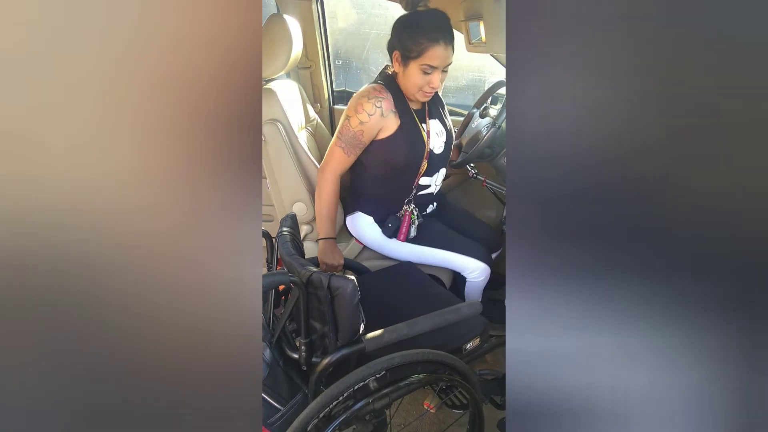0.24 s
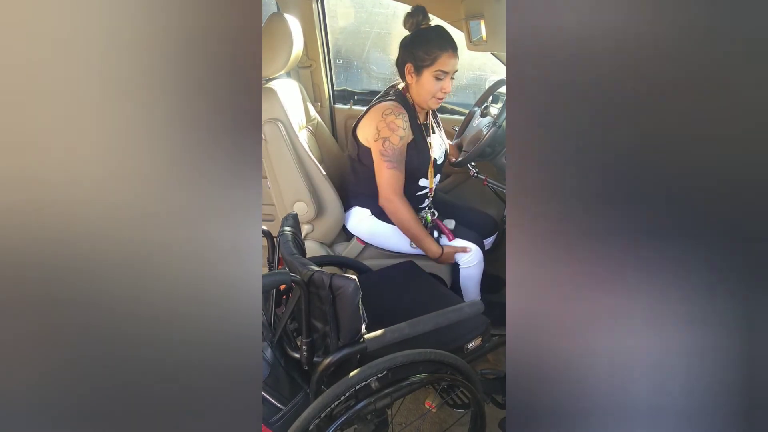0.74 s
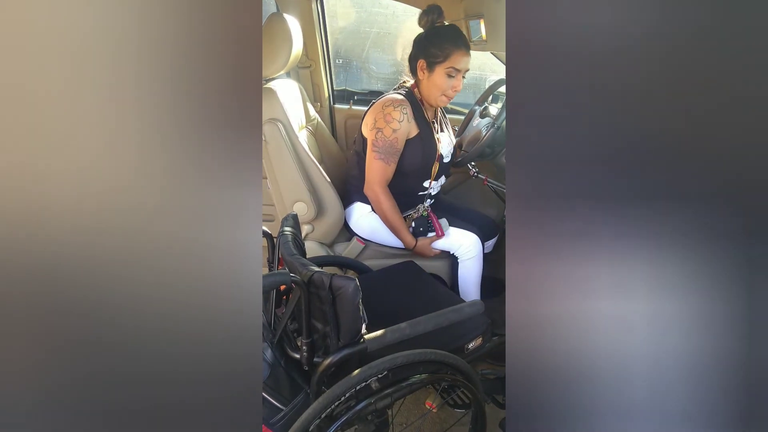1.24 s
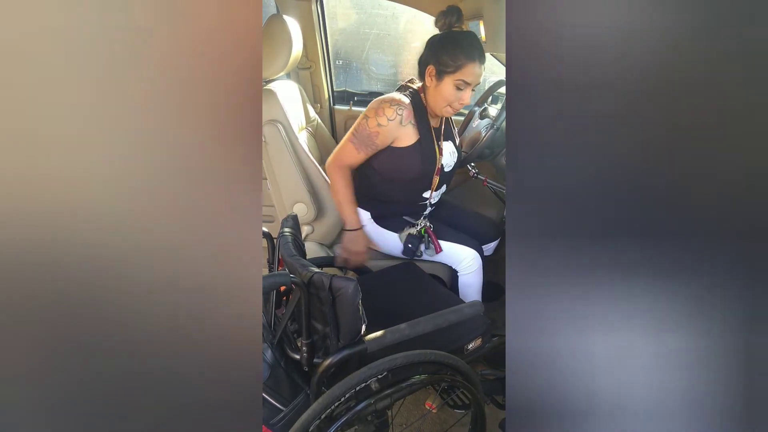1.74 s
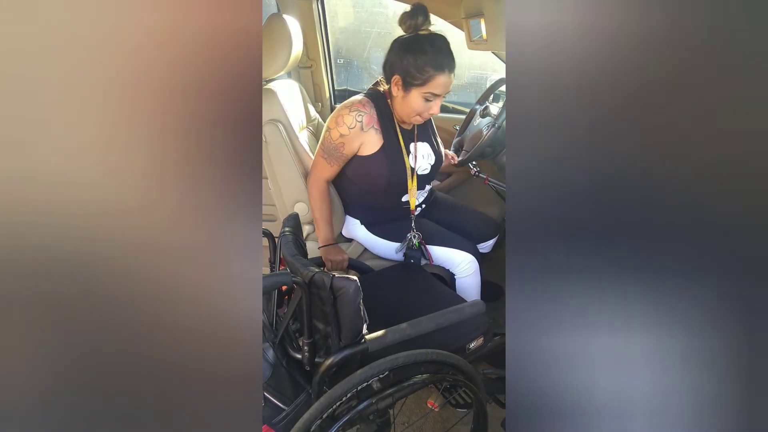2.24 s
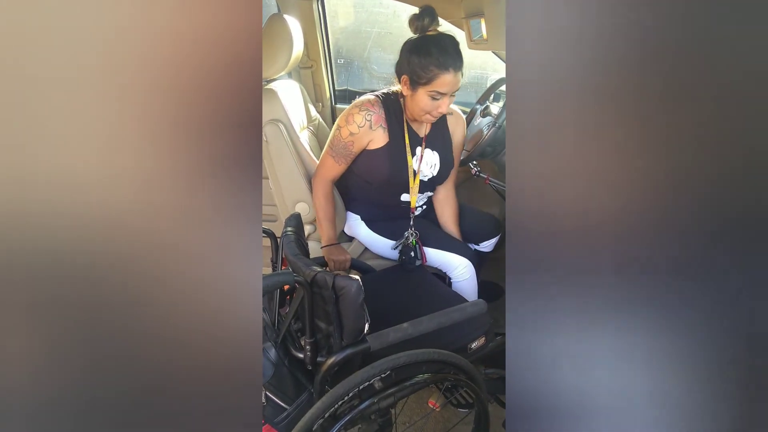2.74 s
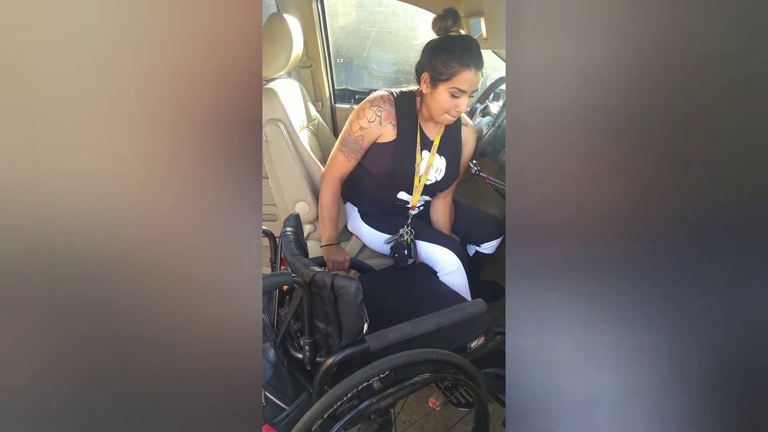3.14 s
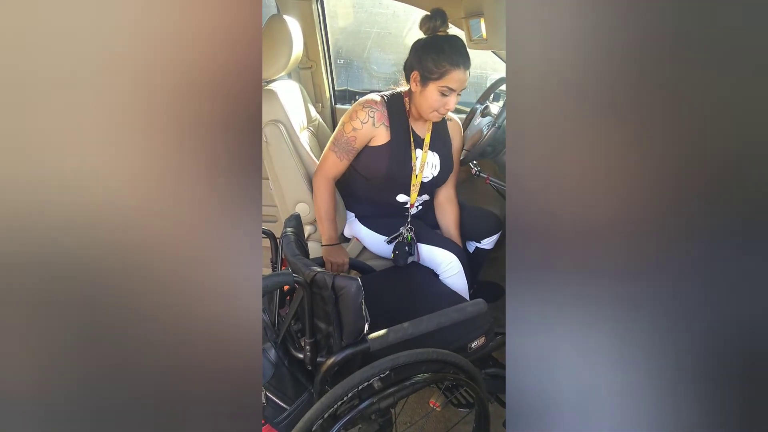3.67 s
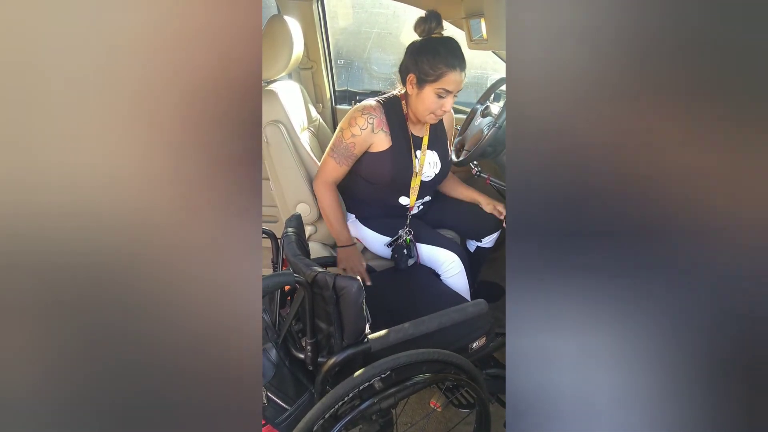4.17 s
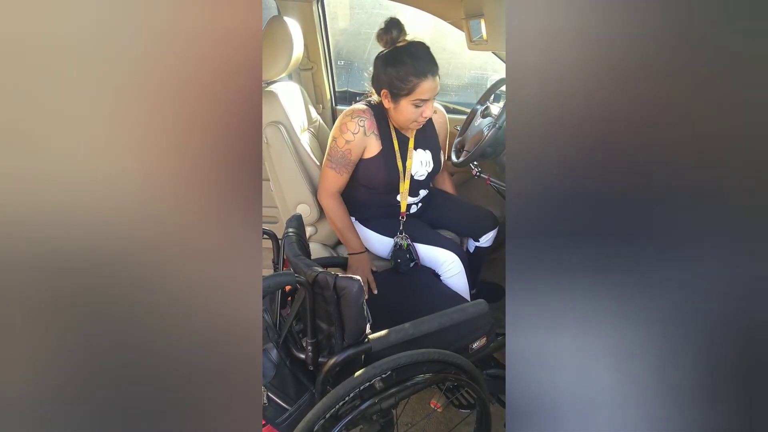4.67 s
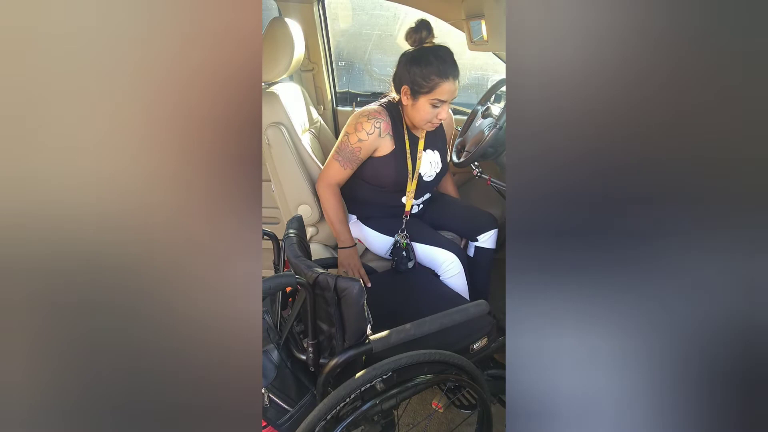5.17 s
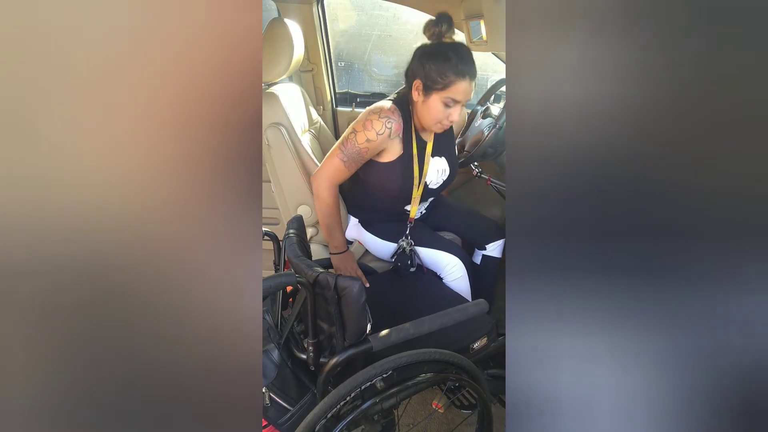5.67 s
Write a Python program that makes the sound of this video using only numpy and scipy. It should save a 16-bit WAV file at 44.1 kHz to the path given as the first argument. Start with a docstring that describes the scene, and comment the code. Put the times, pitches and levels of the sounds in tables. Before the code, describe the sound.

A bunch of keys jangles and clinks in irregular bursts while clothes rustle, a seat knocks and squeaks, and a car cabin rumbles low.

```python
"""Keys clink and rattle in swells over rustling cloth, dull knocks, thin squeaks and a low cabin rumble.
A bunch of keys swings on a lanyard while someone shifts across a car seat towards a wheelchair.
Keys ring until they stop each other, plastic fobs clack, and many tiny contacts make the rattle.
Clothes rub, seat and chair frame knock and squeak: filtered noise and fading tones make these sounds.
A machine hum of four unsteady tones, shaped noise for rumble and a faint hiss fill the cabin."""
import sys
import numpy as np
from scipy import signal
from scipy.fft import rfft, irfft, next_fast_len
from scipy.io import wavfile
from scipy.ndimage import uniform_filter1d, map_coordinates

SR = 44100
rng = np.random.default_rng(int(sys.argv[2]) if len(sys.argv) > 2 else 0)


def output_pcm(signal):
    """Save a mono or channel-first signal as 16-bit PCM at the path in sys.argv[1].

    Samples are clipped to [-1, 1] before scaling.
    """
    pcm = np.clip(np.atleast_2d(signal).T, -1, 1) * 32767
    wavfile.write(sys.argv[1], SR, np.round(pcm).astype(np.int16))


N = 260631
T = np.arange(SR // 3) / SR  # time within one hit, in s

# colour of small hard contacts: (f/Hz, level/dB)
CONTACT = [(800, -39), (2200, -13), (3000, -2.5), (4300, -4), (5200, -0.5), (7000, -1), (9000, -3),
           (12000, -7.5), (14300, -14), (16000, -26.5)]
# higher ringing modes of each kind of key: (f/Hz, relative level/dB, t60/s)
KEYS = {"long": [(6320, 0, .14), (6803, -8, .15), (7644, 3, .09), (8790, 1, .1), (11560, -7, .12),
        (14120, -12, .1)], "short": [(4386, 3, .07), (5905, -12, .1), (6810, -7, .12), (7670, -4, .07),
        (8840, 0, .1), (12800, -13, .06), (13780, -11, .07)], "flat": [(6803, 0, .16), (7740, 0, .06),
        (8760, -5, .06), (10510, -4, .11), (11560, -2, .12), (12840, -11, .08), (14150, -9, .07)],
        "thin": [(7670, 1, .07), (8700, -5, .05), (9800, -3, .07), (13110, -6, .1), (14500, -9, .07)]}
# range in which the small parts ring: (lowest f/Hz, highest f/Hz)
SMALL_HZ = (2600, 15000)


def amp(db):
    """Decibels to gain."""
    return 10 ** (np.asarray(db) / 20)


def unit(x):
    """Scale to rms 1."""
    return x / np.sqrt(np.mean(x ** 2) + 1e-20)


def along(points, hz):
    """Read a curve of (f/Hz, value) points on a log frequency axis."""
    f, v = np.transpose(points)
    return np.interp(np.log(hz + 1), np.log(f + 1), v)


def curves(rows):
    """One value per sample for each column after the time."""
    s, *cols = np.transpose(rows)
    return [np.interp(np.arange(N) / SR, s, c) for c in cols]


def wobble(rate):
    """A smooth random curve through rate random knots a second."""
    knots = rng.standard_normal(int(N * rate / SR) + 4)
    return map_coordinates(knots, [np.arange(N) * rate / SR])


def filtered(x, response):
    """Multiply the spectrum of x by a response of frequency."""
    m = next_fast_len(x.shape[-1] + SR // 5)
    spectrum = rfft(x, m) * response(np.fft.rfftfreq(m, 1 / SR))
    return irfft(spectrum, m)[..., :x.shape[-1]]


def coloured(pair, spectrum, ripple_db=0):
    """Blend two unrelated signals into a left and right of rms 1, more or less alike by frequency."""
    # how alike left and right are: (f/Hz, likeness from -1 opposite to 1 same)
    alike = [(40, -0.46), (70, 0.33), (130, 0.3), (300, 0.58), (700, 0.67), (1400, 1), (2200, -0.71),
             (3100, 0.48), (4300, -0.13), (15000, -0.39)]
    knots = rng.standard_normal(SR // 400)  # random resonances a few hundred Hz wide

    def response(hz):
        turn = np.arccos(np.clip(along(alike, hz), -1, 1)) / 2
        ripple = ripple_db * np.interp(hz, np.linspace(0, SR / 2, len(knots)), knots)
        return amp(along(spectrum, hz) + ripple) * np.array([np.cos(turn), np.sin(turn)])

    mid, side = filtered(pair, response)
    return unit(np.array([mid + side, mid - side]))


def noise(spectrum, size, ripple_db=0):
    """Stereo noise of a given colour."""
    return coloured(rng.standard_normal((2, size)), spectrum, ripple_db)


def fade(t60, rise):
    """A hit's envelope: a quick rise and a fall of 60 dB in t60 seconds."""
    return np.exp(-np.log(1000) * T / max(t60, 1e-3)) * (1 - np.exp(-T / max(rise, 1e-5)))


def tone(hz, spread, blur=0):
    """A stereo sine; spread is the random phase shift per side in rad, blur the line width over pitch."""
    drift = 0
    if blur:
        drift = np.sqrt(2 * np.pi * abs(blur) * hz / SR) * np.cumsum(rng.standard_normal(len(T)))
    phase = rng.uniform(0, 2 * np.pi) + spread * rng.standard_normal((2, 1))
    return np.sin(2 * np.pi * hz * T + phase + drift)


def shake(rate=600, depth=.55):
    """Fast random swings of gain over one hit, as a ringing key trembles against its neighbours."""
    knots = rng.standard_normal(int(rate * T[-1]) + 1)
    return np.sqrt(1 - depth ** 2) + depth * np.interp(T * rate, np.arange(len(knots)), knots)


def patchy(x, depth_db, size):
    """Make brief swells come and go in separate bands; size is the frame in samples."""
    z = signal.stft(x, nperseg=size)[2]
    field = uniform_filter1d(rng.standard_normal(z.shape[1:]), size=3, axis=0)  # smooth over frequency
    field = uniform_filter1d(field, size=7, axis=1)  # smooth over time
    return unit(signal.istft(z * amp(depth_db * unit(field)), nperseg=size)[1][:, :N])


def swells(rows, swell_db=20):
    """Level in dB of movements that each climb swell_db in the rise time and sink it in the fall time."""
    t = np.arange(N) / SR
    gain = sum(amp(db - swell_db * np.maximum((s - t) / rise, (t - s) / fall))
               for s, db, rise, fall in rows)
    return 20 * np.log10(gain + 1e-5)


def add(track, s, sound):
    """Mix a sound into the track at s seconds."""
    part = track[:, max(round(s * SR), 0):][:, :sound.shape[1]]
    part += sound[:, :part.shape[1]]


def cabin(boom_db=3.5, rumble_db=1, waver_hz=1.414, restless_db=1.5, hiss_db=-69):
    """Low, restless noise in two bands with a slightly unsteady machine hum and a faint hiss."""
    # cabin noise before the shared offsets: (t/s, boom level/dB, rumble level/dB)
    levels = [(0.0, -41.5, -36.5), (0.51, -46, -40), (1.18, -41, -37), (1.51, -41, -41), (1.79, -42, -39),
              (2.68, -42, -36), (2.88, -48, -42.5), (3.78, -41, -39), (4.61, -46, -42.5),
              (5.1, -40.5, -45.5), (5.63, -46.5, -43), (5.91, -42.5, -37)]
    # colour of the deep boom: (f/Hz, level/dB)
    boom_colour = [(20, -47.5), (40, -39.5), (60, -15.5), (85, -6), (140, -0.5), (220, -7), (300, -10),
                   (450, -20.5), (900, -56)]
    # colour of the rumble above it: (f/Hz, level/dB)
    rumble_colour = [(100, -20.5), (220, -4.5), (320, 1), (450, 0.5), (580, -5), (760, -3.5), (880, -17),
                     (1000, -30.5), (1500, -34.5), (3000, -58)]
    # tones of the machine hum, about which pitch and level waver: (f/Hz, level/dB)
    hum_tones = [(127.3, -55), (254.2, -51), (381.5, -52.5), (698, -57)]
    # colour of the faint steady hiss: (f/Hz, level/dB)
    hiss_colour = [(1500, -5), (3200, 2), (6000, -3.5), (10000, -3.5), (15000, -17)]
    low_db, mid_db = curves(levels)
    boom = amp(low_db + boom_db + restless_db * wobble(6.2)) * noise(boom_colour, size=N)
    rumble = amp(mid_db + rumble_db) * patchy(noise(rumble_colour, size=N), depth_db=3.5, size=1024)
    hum = 0
    for hz, db in hum_tones:
        phase = 2 * np.pi * np.cumsum(hz + waver_hz * wobble(8)) / SR
        hum = hum + amp(db + 0.52 * wobble(7.7)) * np.sqrt(2) * np.sin(phase)
    return boom + rumble + hum + amp(hiss_db) * noise(hiss_colour, size=N)


def reflections(x):
    """Windows and trim answer briefly: a short noise tail that fades at its own pace in each band."""
    # how fast the cabin's echoes die away: (f/Hz, t60/s)
    trim = [(200, 0.0587), (1500, 0.16), (4000, 0.1), (14000, 0.027)]
    flat_noise = noise([(20, 0), (SR / 2, 0)], size=len(T))
    hz, t, z = signal.stft(flat_noise, SR, nperseg=256)
    tail = signal.istft(z * amp(-60 * t / along(trim, hz)[:, None]), SR, nperseg=256)[1]
    delayed = np.pad(x, ((0, 0), (SR // 300, 0)))  # the answer starts 1/300 s late
    return signal.fftconvolve(delayed, tail / np.linalg.norm(tail[0]), axes=1)[:, :N]


def clothes(level_db=-1):
    """Fabric slides over the seat: noise in an even rustle that swells with each movement."""
    # slides of clothes, before the offset: (peak t/s, level/dB, rise/s, fall/s)
    slides = [(.02, -38, 0.16, 0.17), (.41, -40, 0.072, 0.18), (.72, -45.5, 0.046, 0.71),
              (.84, -31.5, 0.3, 0.09), (2.295, -44.5, 0.12, 0.067), (3.2, -58, 0.28, 0.5),
              (4.99, -35, 0.034, 0.093), (5.21, -52, 0.037, 0.095), (5.82, -39.5, 0.082, 0.16)]
    # colour of rubbing cloth: (f/Hz, level/dB)
    cloth = [(500, -16), (900, -6.5), (1200, -6), (1600, -13), (2000, -2), (2300, -2.5), (2800, -6.5),
             (4000, -9.5), (14000, -20)]
    rustle = amp(wobble(70)) * patchy(noise(cloth, size=N), depth_db=1.5, size=512)
    return amp(swells(slides) + level_db) * unit(rustle)


def squeaks(level_db=-3, waver=0.0056, width=0.28):
    """A wavering tone inside a band of rubbing noise swells and stops; width is a share of its pitch."""
    # squeaks and rubs of seat and chair under shifting weight, before the offset:
    # (t/s, length/s, f/Hz, level/dB, share of rubbing noise 0-1)
    rubs = [(0.673, 0.057, 1376, -36.5, 0.18), (.675, 0.069, 1130, -37, 0.6), (0.765, 0.34, 1086, -40, 0.8),
            (1.162, 0.068, 1444, -45, 0.5), (2.227, 0.042, 1330, -37, 0.3), (2.24, 0.13, 1178, -41.5, 0.53),
            (2.658, 0.067, 1574, -45.5, 0.13), (3.73, 0.28, 1308, -55.5, 0.42),
            (3.741, 0.27, 92.8, -32, 0.37), (5.451, 0.05, 700, -25.5, 0)]
    out = np.zeros(N)
    for s, length, hz, db, share in rubs:
        share = np.clip(share, 0, 1)
        swell = np.sin(np.pi * np.clip((np.arange(N) / SR - s) / length, 0, 1))
        phase = 2 * np.pi * np.cumsum(hz * (1 + waver * wobble(40))) / SR
        rub = wobble(width * hz) * np.sin(phase) + wobble(width * hz) * np.cos(phase)
        mixed = np.sqrt(1 - share) * np.sin(phase) + np.sqrt(share) * rub / np.sqrt(2)
        out += amp(db + level_db) * swell * mixed
    return out


def knocks(crack_db=-8, thud_db=-5, bounce_db=-7, crack_t60=0.026):
    """The fittings crack and rebound, the cushion thuds and the part that is struck rings."""
    # knocks on seat and chair frame, crack and thud before their offsets:
    # (t/s, crack level/dB, thud level/dB, ring level/dB, ring f/Hz, ring t60/s)
    blows = [(0.04, -20, -59, -23.5, 1440, 0.019), (0.0724, -24, -62, -26, 1320, 0.021),
             (0.351, -22, -50, -28, 1200, 0.025), (0.374, -11.5, -51, -23.5, 1320, 0.032),
             (1.394, -24.5, -58, -32.5, 1370, 0.014), (1.877, -30, -52, -36.5, 1940, 0.13),
             (2.766, -20, -27.5, -32.5, 2040, 0.045), (3.083, -32, -58, -42, 1274, 0.039),
             (3.1855, -23.5, -57, -21, 1290, 0.014), (4.449, -13.5, -56, -23.5, 3720, 0.024),
             (4.4532, -22, -31.5, -13, 472, 0.035), (4.968, -16, -31, -19, 220, 0.092),
             (4.975, -24, -21.5, -24, 130, 0.13), (5.002, -21, -26.5, -18.5, 247, 0.088),
             (5.168, -37, -24.5, -31, 1100, 0.049), (5.199, -23, -24.5, -25.5, 482, 0.07),
             (5.4598, -11.5, -45, -5, 1300, 0.0071), (5.4897, -13, -24.5, -20, 1110, 0.028),
             (5.787, -20, -26, -15, 1245, 0.024)]
    # colour of the hard crack: (f/Hz, level/dB)
    crack_colour = [(300, -17), (700, -3), (1300, 5.5), (1900, -2), (2300, 4.5), (2900, 3.5), (4500, -4),
                    (9000, -7), (15000, -20)]
    # colour of the soft thud: (f/Hz, level/dB)
    thud_colour = [(25, -51), (50, -35), (90, -22), (210, 2), (450, 2), (800, -4), (1500, -18.5),
                   (3000, -77)]
    out = np.zeros((2, N))
    for s, sharp_db, soft_db, ring_db, hz, t60 in blows:
        def crack():
            grain = noise(crack_colour, size=len(T), ripple_db=-1.5) * shake()
            return amp(sharp_db + crack_db) * grain * fade(crack_t60, 0.00061)

        thud = amp(soft_db + thud_db) * noise(thud_colour, size=len(T)) * fade(0.23, 0.00047)
        ring = amp(ring_db) * tone(hz, spread=.3) * fade(t60, 0.00086)
        add(out, s, crack() + thud + ring)
        # three quick rebounds, each weaker than the one before
        for k, delay in enumerate(np.cumsum(rng.uniform(.007, .014, size=3)), 1):
            add(out, s + delay, amp(k * bounce_db) * crack())
    return out


def clacks(level_db=-5, rise_share=0.022):
    """Fobs and rings hit with a short, clattering crack and one broad, dead resonance."""
    # dry clacks, before the offset: (t/s, level/dB, t60/s, resonance f/Hz, its level over the crack/dB)
    taps = [(.0412, -15, 0.033, 4840, -23), (0.128, -29.5, .077, 5100, 2), (0.237, -29, 0.034, 5660, 0),
            (0.3364, -17, 0.061, 4370, 0), (.4014, -34, 0.018, 7600, -6), (0.451, -28.5, 0.084, 3760, 5.5),
            (0.4738, -17, 0.032, 13150, -1), (.5367, -19.5, 0.015, 3930, 3.5),
            (.6164, -21, .039, 11600, -6), (0.7723, -16, 0.02, 4330, -8), (.841, -30, 0.016, 3640, 3),
            (1.048, -27, 0.082, 3064, -2.5), (1.382, -36.5, 0.11, 3046, 12), (1.748, -26.5, 0.053, 3800, 5),
            (1.847, -22, .035, 5200, -13), (1.882, -24.5, 0.02, 3680, 11.5), (1.899, -12, 0.01, 3460, 11.5),
            (2.2497, 2, 0.0051, 5900, -8), (2.251, -20, 0.029, 8040, 1), (2.261, -19, 0.022, 7710, -1),
            (2.294, -35, 0.028, 3180, 9.5), (2.3617, -36.5, 0.082, 7000, 2.5),
            (2.632, -30, 0.04, 6490, 3.5), (2.712, -47, 0.029, 7870, 17), (2.762, -16, 0.049, 8560, 3),
            (2.7676, -13, 0.031, 3860, 0.5), (2.772, -17, 0.038, 9600, 9),
            (3.212, -35.5, 0.019, 2660, 12.5), (3.322, -37, 0.035, 8960, 13.5),
            (4.611, -44, 0.021, 8030, 5), (5.385, -26.5, .08, 13600, 0), (5.877, -28.5, 0.029, 8700, 7.5)]
    out = np.zeros((2, N))
    for s, db, t60, hz, mode_db in taps:
        crack = noise(CONTACT, size=len(T), ripple_db=4) * shake()
        body = crack + amp(mode_db) * tone(hz, spread=.85, blur=.05)
        # soft contacts both start and end slowly
        add(out, s, amp(db + level_db) * body * fade(t60, rise_share * t60))
    return out


def tinkle(rate, t60, size_db, count=4, size=1100):
    """Small rings and clasps touch rate times a second; each contact rings count brief partials."""
    draws = rng.random((int(rate * N / SR), 3 + 4 * count))
    at, force, life = draws[:, :3].T[..., None]
    pitch, weight, *phases = np.split(draws[:, 3:], 4, axis=1)  # one set of phases for each side
    hz = SMALL_HZ[0] + (SMALL_HZ[1] - SMALL_HZ[0]) * pitch
    # the first partial belongs to a key
    key_hz = np.array([mode_hz for modes in KEYS.values() for mode_hz, _, _ in modes])
    hz[:, 0] = key_hz[(pitch[:, 0] * len(key_hz)).astype(int)]
    strength = amp(-size_db * np.log(1 - force)) * weight
    decay = np.exp(-np.log(1000) * T[:size] / (t60 * (.5 + life)))  # life varies t60 by half
    decay *= np.sqrt(np.linspace(1, 0, size))
    where = ((at * N).astype(int) + np.arange(size)).ravel()
    sides = []
    for phase in phases:
        partials = np.sin(2 * np.pi * (hz[..., None] * T[:size] + phase[..., None]))
        ring = (strength[..., None] * partials).sum(axis=1) * decay
        sides.append(np.bincount(where, ring.ravel(), N)[:N])
    return coloured(np.array(sides), CONTACT)


def rattle(scrape_db=-6, tinkle_db=-2, low_db=-12, loose_db=-56, contacts_per_s=600):
    """Tiny contacts scrape, tinkle and nudge the keys' lowest modes; in gentle motion keys mostly slide."""
    # swings of the bunch, each a swell of rattling: (peak t/s, relative level/dB, rise/s, fall/s)
    swings = [(.09, -47, .08, 0.26), (.345, -26, 0.073, 0.084), (.66, -28.5, 0.15, 0.1),
              (.795, -24.5, 0.033, 0.028), (.925, -31, 0.055, 0.048), (1.115, -36.5, 0.11, 0.24),
              (1.78, -33, .12, 0.18), (1.905, -28.5, 0.057, 0.017), (2.025, -39.5, 0.1, 0.079),
              (2.21, -41, 0.034, 0.073), (2.265, -45, 0.0087, .11), (2.78, -47, 0.22, 0.23),
              (3.41, -48.5, 0.21, 0.15), (4.3, -58, 0.15, 0.17), (4.51, -44.5, 0.12, 0.15),
              (5.0, -42.5, 0.052, 0.13), (5.18, -54.5, 0.16, 0.35), (5.405, -41, 0.034, 0.12),
              (5.59, -43, 0.14, 0.047), (5.83, -36.5, 0.1, 0.57)]
    # lowest bending modes in the bunch: (f/Hz)
    bending_hz = [3460, 3590, 3630]
    level_db = swells(swings)
    loose = 1 / (1 + amp(2 * (loose_db - level_db)))  # share of the bunch that swings free
    touches = (rng.random(N) < contacts_per_s / SR) * rng.standard_normal(N)
    grit = amp(3.5 * wobble(contacts_per_s / 2))  # the sliding catches and slips
    scrape = patchy(grit * noise(CONTACT, size=N), depth_db=6.5, size=256)
    low = 0
    for hz in bending_hz:
        mode = tone(hz, spread=.18) * fade(.05, .00044)
        low = low + signal.fftconvolve(touches[None], mode, axes=1)[:, :N]
    ringing = amp(tinkle_db) * tinkle(contacts_per_s, t60=0.077, size_db=1.3)
    ringing += amp(low_db) * unit(low)
    return amp(level_db) * (amp(scrape_db) * scrape + loose * ringing)


def small_part():
    """A small part touched by a key rings briefly at six random pitches."""
    return sum(tone(hz, spread=1) for hz in rng.uniform(*SMALL_HZ, size=6)) * fade(0.054, 0.001)


def clinks(low_db=2, ring_db=1.0, tick_db=-3, after_db=-25, stop_s=0.0046, scatter_db=1.5,
           partner_db=-11, rebound_db=-5, chatter_db=-8, chatter_most_db=-27,
           linger_db=-14, linger_most_db=-45, linger_t60=0.42, linger_rough=.25):
    """Each strike rings a key until a neighbour damps it; returns the lowest mode and the bright rest."""
    # key strikes, levels before their offsets: (t/s, key, lowest mode f/Hz, lowest mode level/dB,
    # bright modes level/dB, free ringing before a neighbour stops the key/s)
    strikes = [(.015, "long", 3586, -26.5, -20, 0.04), (.2903, "long", 3590, -55, -26.5, 0.0074),
               (.311, "short", 3590, -37, -24, 0.024), (0.337, "short", 3700, -34, -21, 0.0076),
               (.51, "short", 3610, -41, -37, 0.048), (.5648, "flat", 3590, -26.5, -28, 0.0037),
               (.599, "long", 3570, -37, -46, 0.039), (.6338, "long", 3582, -8.5, -25, 0.018),
               (.66, "long", 3540, -24, -36, 0.003), (.7043, "long", 3620, -32.5, -52, .008),
               (.7706, "short", 3610, -31, -30.5, 0.017), (.78, "long", 3490, -38, -38, .02),
               (0.8642, "flat", 3680, -19, -22.5, 0.0022), (.88, "flat", 3420, -26, -30, 0.0024),
               (.9118, "flat", 3580, -35, -41, 0.014), (1.1135, "short", 3700, -53, -31.5, 0.017),
               (1.164, "thin", 3590, -45, -28, 0.0061), (1.1716, "long", 3590, -33, -31, 0.018),
               (1.282, "thin", 3600, -40.5, -34, .014), (1.222, "long", 3650, -45, -65, 0.0095),
               (1.325, "long", 3540, -48, -61, 0.063), (1.5394, "thin", 3410, -47, -42, 0.0039),
               (1.64, "long", 3560, -38.5, -37, 0.016), (1.708, "long", 3680, -41, -24.5, 0.0086),
               (1.7646, "long", 3600, -24.5, -51, 0.057), (1.785, "short", 3590, -19, -28, 0.014),
               (1.7955, "long", 3563, -17.5, -20, 0.0056), (1.8975, "thin", 3470, -13, -21.5, 0.002),
               (2.001, "flat", 3530, -37.5, -46, 0.01), (2.0145, "flat", 3580, -36, -38, 0.0099),
               (2.029, "flat", 3350, -35.5, -54, 0.0021), (2.054, "flat", 3420, -38, -50, 0.0065),
               (2.0958, "flat", 3520, -38, -38.5, 0.0052), (2.128, "thin", 3520, -50, -48, 0.0062),
               (2.145, "flat", 3600, -44, -45.5, 0.0054), (2.2116, "long", 3200, -37.5, -35, 0.0042),
               (2.584, "long", 3560, -49.5, -46.5, .01), (3.3247, "long", 3590, -46.5, -37, .011),
               (3.672, "flat", 3566, -33.5, -35, 0.01), (3.708, "long", 3575, -41.5, -48, 0.016),
               (4.3843, "short", 3570, -40, -35, 0.0054), (4.506, "short", 3660, -49.5, -54, 0.039),
               (4.543, "short", 3510, -48, -36.5, 0.0079), (4.7722, "thin", 3750, -55, -48, 0.01),
               (5.101, "long", 3610, -40, -37.5, 0.062), (5.324, "flat", 3590, -52.5, -59, .03),
               (5.3988, "short", 3630, -32.5, -27, 0.007), (5.5535, "long", 3650, -38, -32, 0.0094),
               (5.566, "flat", 3570, -31.5, -40, 0.0049), (5.622, "long", 3620, -53, -54, 0.048),
               (5.68, "long", 3680, -53, -61, 0.028), (5.8028, "short", 3570, -37, -25.5, 0.0092),
               (5.8598, "long", 3590, -61, -33, 0.0046)]
    # colour of a key chattering on its ring: (f/Hz, level/dB)
    buzz_colour = [(2000, -54), (3000, -23.5), (3500, -1), (4000, -11.5), (5000, -40.5)]
    lowest, bright = np.zeros((2, 2, N))
    for s, key, key_hz, key_db, bright_db, free in strikes:
        modes = KEYS[key]
        damper = amp(after_db) + (1 - amp(after_db)) * np.exp(-np.maximum(T - free, 0) / stop_s)
        struck = amp(key_db + low_db) * damper * fade(.2, .0006)
        # a faint ring escapes the damping
        linger = amp(min(key_db + linger_db, linger_most_db)) * fade(linger_t60, 0.0027)
        # the key chatters on its split ring, which roughens the tone
        chatter = amp(min(key_db + chatter_db, chatter_most_db)) * damper * fade(0.43, .0006)
        buzz = (chatter + linger_rough * linger) * noise(buzz_colour, size=len(T))
        # the point of contact weights the modes
        sizes = amp(np.array(modes)[:, 1] + rng.normal(0, scatter_db, len(modes)))
        sizes /= np.linalg.norm(sizes)
        ring = amp(partner_db) * small_part()
        for gain, (hz, _, t60) in zip(sizes, modes):
            ring += gain * tone(hz + rng.normal(0, 14), spread=1.5) * shake() * fade(t60, .0006)
        tick = noise(CONTACT, size=len(T), ripple_db=4) * fade(.05, .0007)
        add(lowest, s, (struck + linger) * tone(key_hz, spread=.15) + buzz)
        strike = amp(ring_db) * np.sqrt(damper) * ring + amp(tick_db) * tick
        add(bright, s, amp(bright_db) * strike)
        # the key rebounds and touches again; the tick has its sides swapped
        rebound = small_part() / 2 + tick[::-1] * shake()
        add(bright, s + rng.uniform(.006, .016), amp(bright_db + rebound_db) * rebound)
    return lowest, bright


def scene(room_db=-11, key_room_db=-24):
    """Swings drive the rattle; hits and their reflections sit over squeaks, rubbing and rumble."""
    lowest, bright = clinks()
    hits = bright + clacks() + knocks()
    room = reflections(amp(room_db) * hits + amp(key_room_db) * lowest)
    return lowest + hits + room + rattle() + squeaks() + clothes() + cabin()


def record(dry, dip_hz=2290, dip_width_hz=190, dip_db=-11, top_hz=15500):
    """A narrow dip near 2.3 kHz thins the sound below the keys' range; a steep limit cuts the top treble."""
    heard = filtered(dry, lambda hz: amp(dip_db * np.exp(-((hz - dip_hz) / dip_width_hz) ** 2)))
    return filtered(heard, lambda hz: 1 / (1 + (hz / top_hz) ** 120))


dry = scene()
out = record(dry)
output_pcm(out)
```